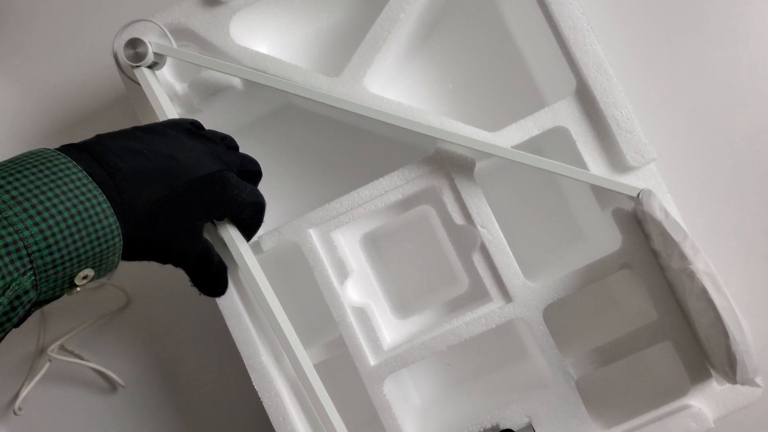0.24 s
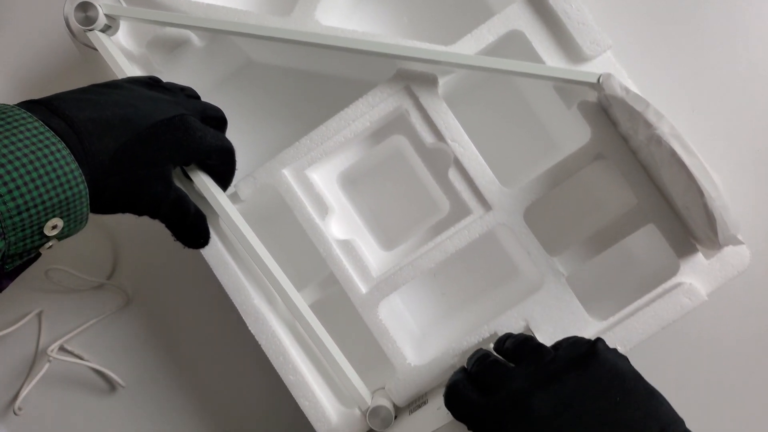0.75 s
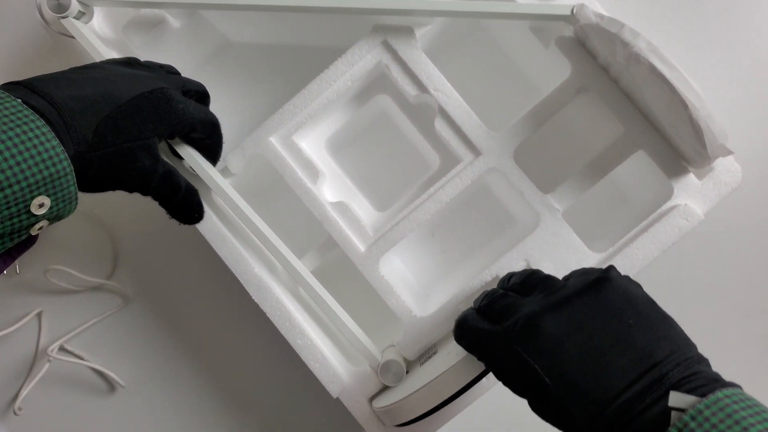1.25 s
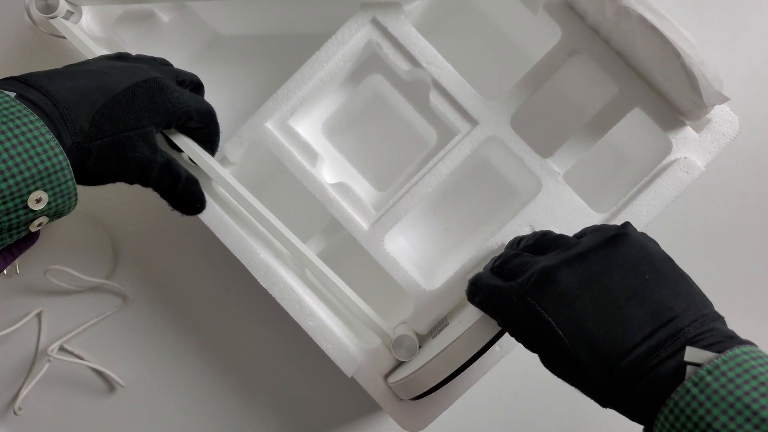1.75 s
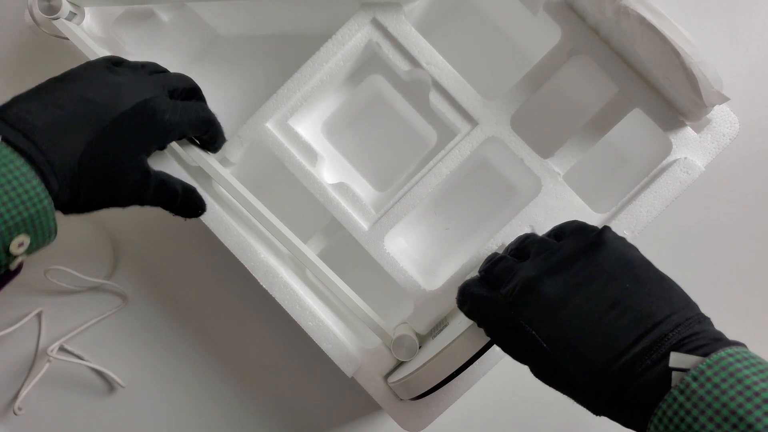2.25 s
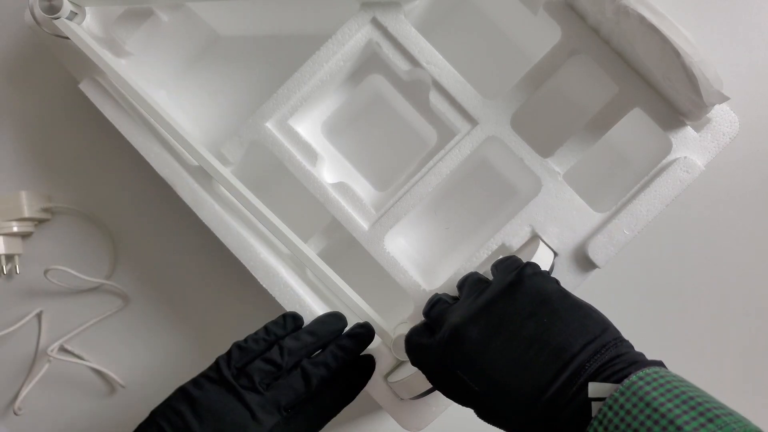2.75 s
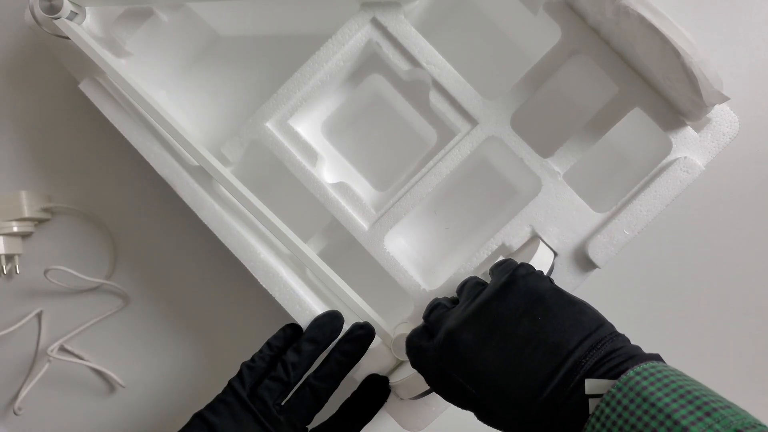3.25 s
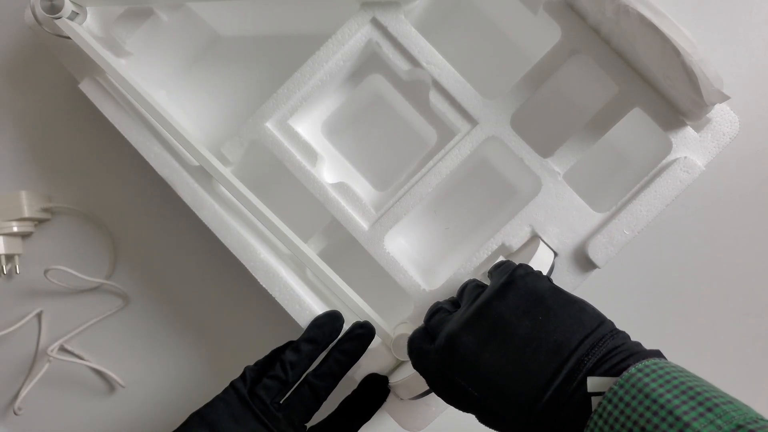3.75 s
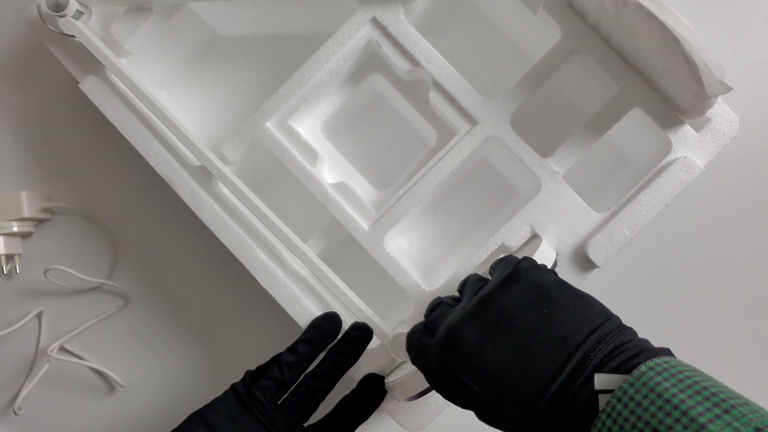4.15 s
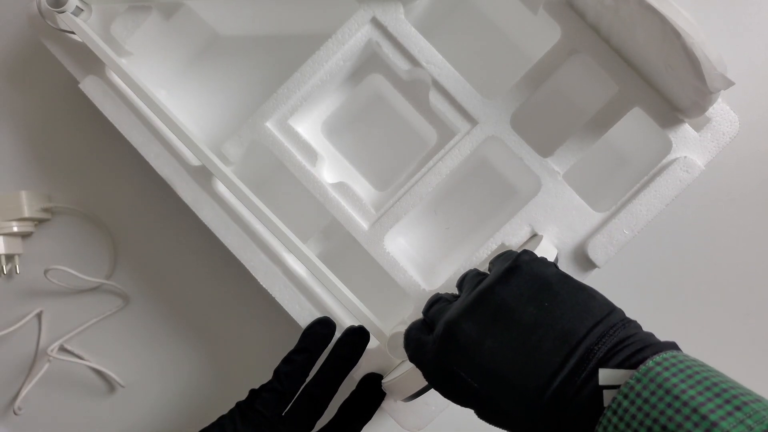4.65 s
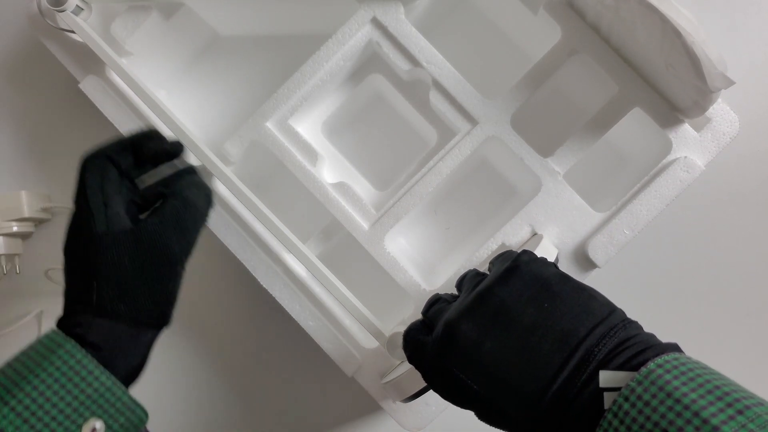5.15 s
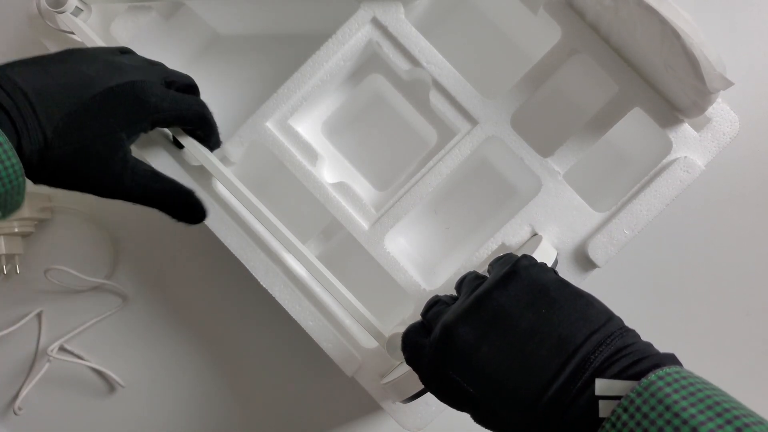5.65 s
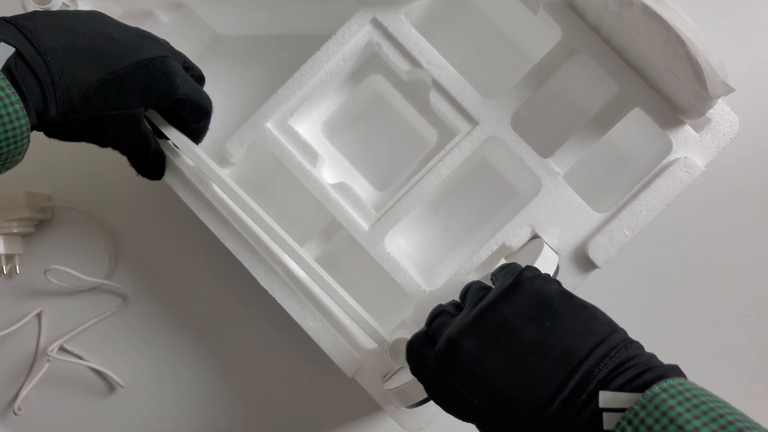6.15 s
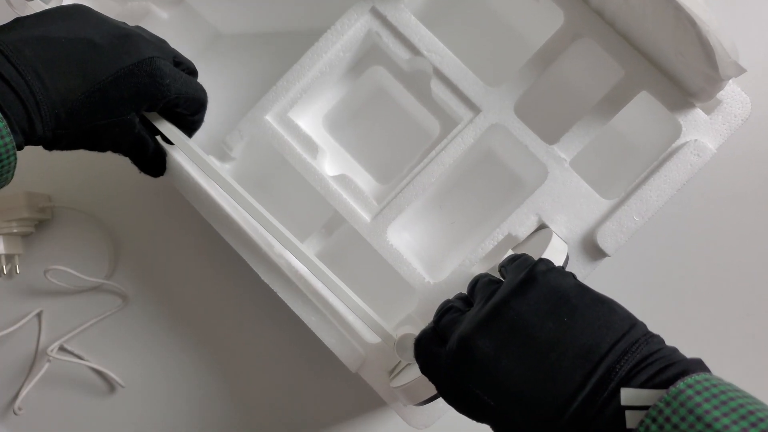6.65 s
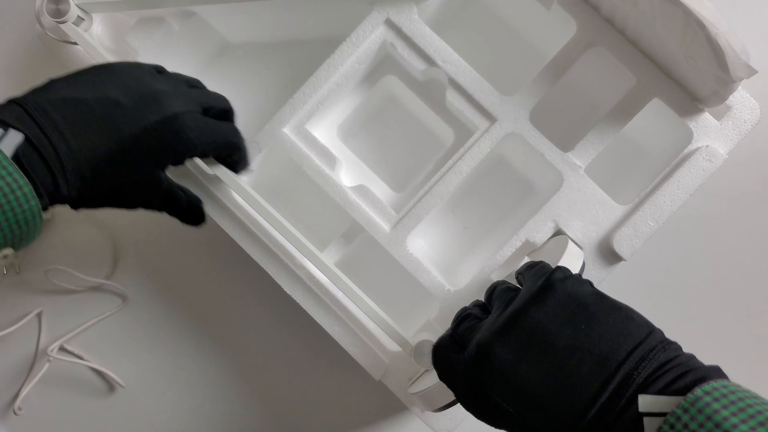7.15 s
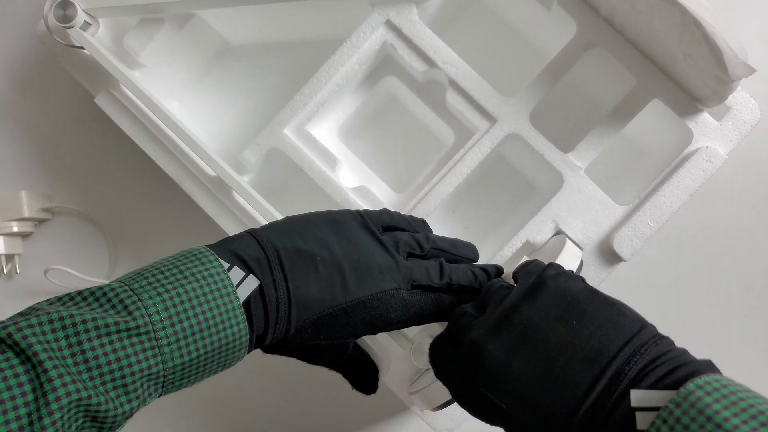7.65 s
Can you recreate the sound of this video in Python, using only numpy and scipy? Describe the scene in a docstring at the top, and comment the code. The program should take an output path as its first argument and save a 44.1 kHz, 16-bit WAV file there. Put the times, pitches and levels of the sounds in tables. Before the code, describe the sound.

Close stereo microphones in a small quiet room. A frame is dragged along a polystyrene tray in one two-second rasp of bright, grainy hiss, stopping abruptly. Short rubs, skids and ticks follow, then a quieter spell of faint creeping. Irregular creaks, fuzzy squeaks and hollow knocks build around five seconds, thin out, and return with dull table bumps and strong final scrapes.

```python
"""Foam tray unpacking

Gloved hands work a metal frame out of a moulded polystyrene tray, close to the microphones in a small room.
Foam beads slip by the thousand: filtered random clicks make a hiss that brightens with sliding speed.
Under pressure, stick-slip jerks ring the tray's decaying modes in a hollow judder; squeaks are narrowband noise.
Around one long pull and many short rubs come skids, ticks, knocks and soft bumps, over quiet air and a faint hum."""
import sys
import numpy as np
from scipy import signal
from scipy.fft import rfft, irfft
from scipy.io import wavfile
from scipy.ndimage import uniform_filter1d

SR = 44100
rng = np.random.default_rng(int(sys.argv[2]) if len(sys.argv) > 2 else 0)


def transcribe(signal):
    """Save signal, clipped to [-1, 1], as a 16-bit WAV file at the path in sys.argv[1]."""
    frames = np.atleast_2d(signal).T
    limited = np.clip(frames, -1, 1)
    pcm = np.round(limited * 32767).astype(np.int16)
    wavfile.write(sys.argv[1], SR, pcm)


N = 348390
TIME = np.arange(N) / SR


def amp(db):
    """Decibels to gain."""
    return 10 ** (np.asarray(db) / 20)


def read(points, hz):
    """A spectrum table read on a log-frequency axis."""
    f, value = np.transpose(points)
    return np.interp(np.log(hz + 1), np.log(f), value)


def colour(x, gain):
    """Filters x by a gain given as a function of frequency."""
    return irfft(rfft(x) * gain(np.fft.rfftfreq(x.shape[-1], 1 / SR)), x.shape[-1])


def evened(pair, lo_hz=20, hi_hz=16000):
    """Scales a stereo pair so that its centre has rms 1 in a band."""
    centre = colour(pair.mean(0), lambda f: (f > lo_hz) & (f < hi_hz))
    return pair / np.std(centre)


def add(mix, s, sound):
    """Mixes a sound in at a time in seconds."""
    part = mix[:, round(s * SR):][:, :sound.shape[-1]]
    part += sound[..., :part.shape[1]]


def flutter(hz, depth_db):
    """The grip or tone wavers at random: a gain from noise that rolls off around hz."""
    drift = colour(rng.standard_normal(N), lambda f: np.exp(-(f / hz) ** 2))
    return amp(depth_db * drift / drift.std())


# Once the hand lets go, the level falls at this rate
RELEASE_DB_PER_S = 173
# The first long pull: (t/s, scrape level/dB, brightness from speed/dB, tray resonance from pressure/dB)
LONG_PULL = [(0.0, -72, -10, -1), (0.04, -71, -16, 3), (0.1, -40, -8, -8), (0.16, -33.5, -5.5, -19),
             (0.76, -31.5, -2, -12), (0.95, -33.5, -3.5, -13.5), (1.09, -33.5, -4.5, -11.5),
             (1.37, -33, -2, -17.5), (1.45, -34, -4, -9), (1.7, -38.5, -6.5, -8), (1.83, -35, -0.5, -11.5),
             (1.93, -34, -3.5, -10), (2.02, -56.5, -11, -10), (2.08, -64, -7, -13)]


def pull(s):
    """Level, brightness and pressure of the long pull, which lets go like any rub."""
    at, *columns = np.transpose(LONG_PULL)
    level_db, bright_db, press_db = (np.interp(s, at, column) for column in columns)
    level_db = level_db - RELEASE_DB_PER_S * np.maximum(s - at[-1], 0)
    return level_db, bright_db, press_db


SAG_DB_PER_S = 31  # a rub eases a little after its swell
DULLING, BITE = 0.28, 0.12  # per dB that a rub slows: dB of brightness lost, dB of tray resonance gained


def push(s, start, swell, length, level_db, bright_db, press_db):
    """One rub: it swells, eases and dies away; the slower the slide, the duller and hollower it is."""
    age = s - start
    rise = np.sin(np.pi / 2 * np.clip(age / swell, 1e-4, 1)) ** 2
    sag_db = SAG_DB_PER_S * np.maximum(age - swell, 0)
    release_db = RELEASE_DB_PER_S * np.maximum(age - length, 0)
    speed_db = 20 * np.log10(rise) - sag_db - release_db
    return level_db + speed_db, bright_db + DULLING * speed_db, press_db - BITE * speed_db


CREEP_BRIGHT_DB, CREEP_PRESS_DB = -10.5, 2
# Between rubs the hands never hold quite still and the frame creeps in its slot: (t/s, level/dB)
CREEP_LEVEL = [(0, -76), (2.0, -65), (2.7, -59.5), (3.4, -69), (3.7, -61), (4.3, -58.5), (5.6, -57.5),
               (6.55, -60.5), (7.9, -56.5)]
# Short rubs: (start t/s, swell/s, time from start to letting go/s, level/dB,
# brightness from speed/dB, tray resonance from pressure/dB)
SHORT_RUBS = [(2.079, 0.12, 0.17, -47.5, -9, -7.5), (2.411, 0.051, 0.043, -40, -1.5, -18),
              (2.495, 0.007, 0.039, -40, -0.5, -8.5), (2.595, 0.046, 0.066, -51, -7, -3.5),
              (2.77, 0.056, 0.092, -35.5, -6.5, -12.5), (2.864, 0.019, 0.14, -45.5, -10, -4),
              (3.0, 0.041, .05, -35.5, 1, -10.5), (3.063, 0.02, 0.062, -37, -3, -9.5),
              (3.826, 0.017, 0.1, -41, -13.5, -2.5), (3.888, .13, 0.22, -33.5, -3.5, -7.5),
              (4.167, 0.025, 0.052, -44, -10.5, -6), (4.308, .125, 0.19, -38.5, -13.5, 4),
              (4.594, .02, 0.032, -56.5, 13, -2), (4.689, 0.018, 0.035, -51, 0.5, -2.5),
              (4.717, 0.055, 0.079, -47.5, -0.5, -2.5), (4.819, 0.032, .055, -45, -2, -6.5),
              (4.909, 0.088, 0.12, -38, -0.5, -4), (5.064, 0.033, 0.074, -33, -5, -3.5),
              (5.133, .04, 0.059, -37, 0.5, -4.5), (5.262, 0.043, .1, -51.5, -9, -4.5),
              (5.382, 0.04, 0.095, -50, -10, -6), (5.697, 0.023, 0.073, -48, -4.5, -6),
              (5.793, 0.039, 0.074, -50, -4.5, -2), (5.905, 0.046, 0.12, -55, -8, -9.5),
              (6.125, 0.049, .055, -47.5, -5.5, -6.5), (6.212, 0.057, 0.13, -41.5, -8, -6),
              (6.588, 0.047, 0.092, -57, -16, -2), (6.791, 0.028, 0.071, -46, -13.5, 3.5),
              (6.891, 0.02, 0.14, -49, -13, 6.5), (7.061, 0.085, 0.13, -37.5, -6.5, 0.5),
              (7.152, 0.056, 0.067, -32, -7.5, -4), (7.23, 0.021, 0.071, -40, 4, -5.5),
              (7.314, 0.063, 0.057, -30, -5, -20), (7.535, 0.057, 0.16, -28, -2.5, -12)]


def rubbing():
    """Pull, rubs and creep add in power at one contact; the stronger weigh more in brightness and pressure."""
    s = TIME[::64]
    creep_db = np.interp(s, *np.transpose(CREEP_LEVEL))
    creep = np.broadcast_arrays(creep_db, CREEP_BRIGHT_DB, CREEP_PRESS_DB)
    rubs = [push(s, *row) for row in SHORT_RUBS]
    level_db, bright_db, press_db = np.stack([pull(s), creep] + rubs, axis=1)
    power = amp(level_db) ** 2
    total_db = 10 * np.log10(power.sum(0))
    return s, total_db, np.average(bright_db, 0, power), np.average(press_db, 0, power)


def slips(per_s, spread_db):
    """Random bead slips: many small, a few large."""
    size = amp(spread_db * np.minimum(rng.exponential(1, N), 5))
    return size * rng.choice([-1, 1], N) * (rng.random(N) < per_s / SR)


def hollows(x, fade_s, size=1024):
    """Short echoes off the tray's pockets, one set per microphone: a fine comb with no broad colour."""
    comb = rfft(rng.standard_normal((2, size)) * np.exp(-np.arange(size) / SR / fade_s))
    broad_power = uniform_filter1d(abs(comb) ** 2, size=15, axis=1)
    echoes = irfft(comb / np.sqrt(broad_power))
    return signal.oaconvolve(x[None], echoes, axes=1)[:, :N]


# Broad colour of the foam's hiss: (f/Hz, relative level per Hz/dB)
FOAM_HISS = [(120, -49), (200, -17), (300, -18.5), (450, -16.5), (800, -9), (1150, -7.5), (1750, -6.5),
             (2350, -1.5), (4100, -2.5), (6000, -3.5), (7500, -2.5), (9600, -9), (12500, -4), (15700, -4.5)]
# Ringing of the thin walls: (f/Hz, width/Hz, lift or dip/dB)
THIN_WALLS = [(1149, 35, 9), (1324, 14.5, 9), (2510, 66, -5), (2563, 180, 3), (3740, 90, 2), (4150, 110, 2),
              (8100, 230, -1.5)]


def foam_gain(hz):
    """The foam's broad colour with the wall resonances on top."""
    walls_db = sum(db / (1 + (2 * (hz - f) / width) ** 2) for f, width, db in THIN_WALLS)
    return amp(read(FOAM_HISS, hz) + walls_db)


def crunch(per_s, spread_db, shared=0.87):
    """Beads slip all along the wall: some reach both microphones through the pockets, the rest mainly one."""
    near = np.array([slips(per_s, spread_db) for _ in range(2)])
    beads = near + shared * hollows(slips(per_s, spread_db), fade_s=0.011)
    return evened(colour(beads, foam_gain), 2000, 7000)


def speed_tilt(hz, bright_db, usual_db=-3.0):
    """Fast sliding lifts the top octaves and thins the middle; slow sliding does the reverse."""
    # (f/Hz, dB of gain per dB of brightness)
    share = read([(1200, -0.57), (2700, -0.23), (4200, 0.14), (7000, 0.47), (10000, 1.0), (15000, 1.24)], hz)
    return amp(share * (bright_db - usual_db))


def patches(shape, depth_db, size=(3, 9)):
    """As the contact travels, narrow resonances of the wall come and go."""
    field = uniform_filter1d(rng.standard_normal(shape), size[0], axis=0)
    field = uniform_filter1d(field, size[1], axis=1)
    return amp(depth_db * field / field.std())


def scrape(contact, dry_db=-2.0):
    """Sliding friction: bead hiss whose top follows the speed."""
    s, level_db, bright_db, _ = contact
    hz, t, z = signal.stft(crunch(per_s=7000, spread_db=2.0), SR, nperseg=512)
    tilt = speed_tilt(hz[:, None], np.interp(t, s, bright_db))
    z = z * tilt * patches(z.shape[1:], depth_db=1.36)
    hiss = signal.istft(z, SR, nperseg=512)[1][:, :N]
    return hiss * amp(np.interp(TIME, s, level_db) + dry_db) * flutter(hz=107, depth_db=0.5)


# Modes of the hollow tray: (f/Hz, relative level/dB, t60/s)
TRAY_MODES = [(133, -20, .05), (216, -14, 0.067), (390, -19, 0.093), (458, 2, 0.066), (560, -36, 0.032),
              (650, -5, 0.087), (720, 12, 0.067), (812, 18.5, 0.047), (1011, 3.5, 0.099),
              (1196, 10.5, 0.048), (1630, -8, 0.033), (2070, -20, .025), (2520, -16, 0.02),
              (2730, -5, 0.028)]


def tray_ring(phase_spread):
    """One blow's ring in the tray; the higher modes reach the two microphones out of step."""
    t = np.arange(4096) / SR
    ring = np.zeros((2, len(t)))
    for hz, db, t60 in TRAY_MODES:
        skew = phase_spread * hz / 1000 * rng.uniform(.7, 1.3) * np.array([[.5], [-.5]])
        ring += amp(db - 60 * t / t60) * np.sin(2 * np.pi * hz * t + skew)
    return ring


# Dull rumble of the rubbed tray between its modes: (f/Hz, relative level per Hz/dB)
TRAY_RUMBLE = [(100, -39), (220, -10.5), (340, -2), (700, 5.5), (1100, -2), (1700, -2.5), (2800, -24),
               (5000, -44), (9000, -39)]


def judder(contact, slips_hz=125, uneven_db=4, grit=0.39, sticking_db=-47, dry_db=-3.5):
    """Pressed lightly the tray rumbles; pressed hard the whole contact sticks and slips and sets it ringing."""
    s, level_db, _, press_db = contact
    turns = np.cumsum(slips_hz * flutter(hz=118.3, depth_db=uneven_db)) / SR
    jerks = np.diff(np.floor(turns), prepend=0) * rng.uniform(0.11, 1, N)  # one per whole turn
    beads = np.array([slips(per_s=2500, spread_db=2.5) for _ in range(2)])
    drive = jerks / jerks.std() + grit * beads / beads.std()
    ring = signal.oaconvolve(drive, tray_ring(phase_spread=1.9), axes=1)[:, :N]
    ring = evened(ring, 500, 1000)
    rumble = colour(beads + .3 * beads[::-1], lambda hz: amp(read(TRAY_RUMBLE, hz)))
    rumble = evened(rumble, 500, 1000)
    press = np.interp(TIME, s, press_db)
    force_db = np.interp(TIME, s, level_db) + press
    stuck = 1 / (1 + amp(0.83 * (sticking_db - force_db)))  # stick-slip's share of the power
    grip = 1 / (1 + amp(-1.2 * (press + 13.0)))  # a fast, light slide hardly wakes the tray
    body = np.sqrt(stuck) * ring + np.sqrt(1 - stuck) * rumble
    return body * grip * amp(force_db + dry_db) * flutter(hz=25, depth_db=2.45)


PASSING_S = 0.54  # standard deviation of each resonance's bell-shaped swell
# Wall resonances, each loudest where the frame passes it: (f/Hz, width/Hz, level against the scrape/dB, peak t/s)
WALL_RINGS = [(850, 29, -18.5, 0.66), (1132, 110, -14.5, 1.25), (1320, 70, -12.5, 1.75),
              (2390, 200, -12, 0.9), (3400, 640, -7, 0.26), (4100, 270, -8, 0.6)]


def singing_wall():
    """The long pull's bead slips wake the wall's resonances one after another."""
    beads = np.array([slips(per_s=2500, spread_db=3) for _ in range(2)])
    out = np.zeros((2, N))
    for hz, width, db, s in WALL_RINGS:
        ring = signal.lfilter(*signal.iirpeak(hz, hz / width, fs=SR), beads)
        out += amp(db) * ring / ring.std() * np.exp(-((TIME - s) / PASSING_S) ** 2 / 2)
    return out * amp(pull(TIME)[0])


# Each of two filter passes is twice this wide: a fixed part plus a share of the pitch
SQUEAK_WIDTH_HZ, SQUEAK_DAMPING = 72, 0.072
# Likeness of the two microphones in the room: (f/Hz, likeness/0-1)
LIKENESS = [(60, 0.54), (130, 0.73), (300, 0.63), (700, 0), (3000, 0.03)]
# Squeaks and groans, where one patch of wall sings in a hard rub:
# (peak t/s, level/dB, f/Hz, standard deviation of the bell-shaped swell/s)
WALL_SQUEAKS = [(2.516, -34, 800, 0.0089), (2.681, -49.5, 1810, 0.037), (2.857, -41, 716, 0.036),
                (2.881, -41, 1640, 0.036), (3.094, -37.5, 1090, 0.01), (3.936, -49.5, 332, 0.034),
                (4.171, -33, 2530, 0.0073), (4.417, -37, 2630, 0.031), (4.409, -41, 900, 0.036),
                (4.453, -37, 695, 0.032), (4.46, -52, 135, 0.03), (4.776, -45.5, 1030, 0.032),
                (5.12, -36.5, 740, .02), (5.127, -34.5, 2600, 0.017), (6.094, -45, 2470, .003),
                (6.138, -53, 238, 0.03), (6.82, -48, 200, 0.039), (6.9, -51, 1450, 0.082),
                (7.125, -46, 260, 0.024), (7.205, -39, 700, 0.023), (7.384, -35.5, 2250, 0.02),
                (7.639, -33, 2570, 0.031)]


def squeaks():
    """Slips crowd into one resonance of the wall for a moment: a fuzzy squeak, or a groan if it is low."""
    out = np.zeros((2, N))
    for s, db, hz, half in WALL_SQUEAKS:
        t = np.arange(-min(3 * half, s), 3 * half, 1 / SR)
        wall = signal.iirpeak(hz, hz / (SQUEAK_WIDTH_HZ + SQUEAK_DAMPING * hz) / 2, fs=SR)
        a, b = rng.standard_normal((2, 2 * SR))[:, :len(t)]
        same = np.clip(read(LIKENESS, hz), 0, 1)
        pair = [a, same * a + np.sqrt(1 - same ** 2) * b]
        tone = signal.lfilter(*wall, signal.lfilter(*wall, pair))
        add(out, s + t[0], amp(db) * tone / tone.std() * np.exp(-(t / half) ** 2 / 2))
    return out


TICK_RISE_S, TICK_DECAY_S = .0005, .01
# Sudden skids as the foam lets go: (peak t/s, level/dB, rise/s, decay/s, brightness/dB)
FOAM_SKIDS = [(2.514, -28.5, 0.0045, 0.01, -4), (3.041, -27.5, 0.005, 0.0095, 1.5),
              (3.846, -34, 0.0011, 0.0049, -4.5), (4.160, -34, .001, 0.011, -2),
              (4.953, -33.5, 0.0032, 0.0085, -7), (5.015, -35.5, 0.0094, 0.022, 5.5),
              (7.561, -39, 0.006, 0.018, 2), (7.694, -27, 0.0044, 0.034, -12.5)]
# Ticks of single beads: (peak t/s, level/dB, brightness/dB)
BEAD_TICKS = [(2.273, -45.5, -1.5), (3.485, -47.5, -17), (3.529, -53.5, -17), (3.6, -45, -17),
              (3.675, -44, -14), (3.738, -51, -30), (3.8303, -42.5, -24), (4.59, -56, 0.5),
              (6.091, -52, -27), (6.433, -51.5, -16), (7.07, -48, -6)]


def bursts():
    """Skids and ticks: brief rushes of bead slips that swell and die away exponentially."""
    beads = crunch(per_s=12000, spread_db=3.5)
    out = np.zeros((2, N))
    ticks = [(s, db, TICK_RISE_S, TICK_DECAY_S, bright) for s, db, bright in BEAD_TICKS]
    for s, db, rise, decay, bright_db in FOAM_SKIDS + ticks:
        start = round(s * SR) - 3000  # room for the swell before the peak
        t = np.arange(start, start + 8192) / SR - s
        rush = colour(beads[:, start:start + len(t)], lambda hz: speed_tilt(hz, bright_db))
        add(out, start / SR, rush * amp(db) * np.exp(np.minimum(t / rise, -t / decay)))
    return out


# Knocks of the frame on the tray: (t/s, peak level/dB, f that the contact favours/Hz)
FRAME_KNOCKS = [(2.274, -38.5, 696), (2.511, -46, 835), (3.915, -41, 298), (4.367, -33, 900),
                (4.440, -29, 700), (5.078, -20, 750), (5.566, -31, 346), (6.090, -44, 347),
                (7.024, -36, 650), (7.073, -30.5, 694), (7.120, -25.5, 437), (7.694, -25.5, 900)]


def knocks(octaves=0.56):
    """The frame strikes the tray; a soft contact favours the low modes, a hard one the high."""
    out = np.zeros((2, N))
    for s, db, hz in FRAME_KNOCKS:
        band = [hz / 2 ** (octaves / 2), hz * 2 ** (octaves / 2)]
        contact = signal.butter(1, band, "band", fs=SR)
        ring = signal.lfilter(*contact, tray_ring(phase_spread=1.56))
        add(out, s, amp(db) * ring / abs(ring).max())
    return out


# Bumps of the tray on the table: (start t/s, level/dB, f/Hz, swell/s)
TABLE_BUMPS = [(4.12, -53, 62, .03), (4.41, -40, 134.6, 0.025), (5.007, -34.5, 108, 0.0085),
               (5.052, -44.5, 134, 0.016), (6.163, -47, 61.6, 0.02), (6.762, -25.5, 138, 0.0023),
               (6.788, -42, 127, 0.012), (6.959, -28.5, 123, 0.003), (7.066, -37, 137, 0.0081),
               (7.224, -31.5, 64, 0.0098), (7.245, -29, 88, 0.01)]


def bumps():
    """Dull, quickly damped pushes through the table: low sines that swell and fade."""
    out, t = np.zeros((2, N)), np.arange(SR // 4) / SR
    for s, db, hz, swell in TABLE_BUMPS:
        shape = (t / swell * np.exp(1 - t / swell)) ** 2
        add(out, s, amp(db) * shape * np.sin(2 * np.pi * hz * t))
    return out


# Room decay: (f/Hz, t60/s)
ROOM_DECAY = [(200, 0.35), (1000, 0.25), (4000, 0.14), (14000, 0.18)]


def room(x):
    """A short diffuse tail of decaying noise in which the bass lingers longest."""
    hz, t, z = signal.stft(rng.standard_normal((2, SR // 2)), SR, nperseg=256)
    decay = amp(-60 * t / read(ROOM_DECAY, hz)[:, None])
    tail = signal.istft(z * decay, SR, nperseg=256)[1]
    tail[:, :200] = 0  # short gap before the tail
    return signal.oaconvolve(x, tail / np.linalg.norm(tail[0]), axes=1)[:, :N]


AIR_DB, HUM_HZ, HUM_DB = -62, 100.7, -66  # noise rms, hum pitch, hum amplitude before it wavers
# The quiet room: (f/Hz, relative level per Hz/dB)
ROOM_AIR = [(25, -18), (60, -7.5), (100, -4.5), (170, -7.5), (300, -9), (800, -15), (2000, -20),
            (5000, -23), (9500, -36), (15000, -24)]


def air():
    """Coloured room noise, partly shared by the two microphones, with a faint wavering hum."""
    a, b = rng.standard_normal((2, N))
    same = lambda hz: np.clip(read(LIKENESS, hz), 0, 1)
    other = colour(a, same) + colour(b, lambda hz: np.sqrt(1 - same(hz) ** 2))
    noise = evened(colour(np.array([a, other]), lambda hz: amp(read(ROOM_AIR, hz))))
    hum = np.sin(2 * np.pi * HUM_HZ * TIME) * flutter(hz=13, depth_db=3.0)
    return amp(AIR_DB) * noise + amp(HUM_DB) * hum


def scene():
    """All the handling sounds, the foam a little to the right, in the room."""
    balance = amp([[-.45], [.45]])  # left, right
    contact = rubbing()
    strokes = scrape(contact) + judder(contact) + singing_wall()
    foam = (strokes + squeaks() + bursts() + knocks()) * balance
    table = bumps()
    return foam + table + amp(-9) * room(foam + 0.5 * table) + air()


EDGE_HZ = 15950


def record(dry):
    """The recorder's band limit: a steep low-pass."""
    lowpass = signal.firwin(511, EDGE_HZ, window=("kaiser", 9), fs=SR)
    return signal.oaconvolve(dry, lowpass[None], "same", axes=1)


dry = scene()
out = record(dry)
transcribe(out)
```